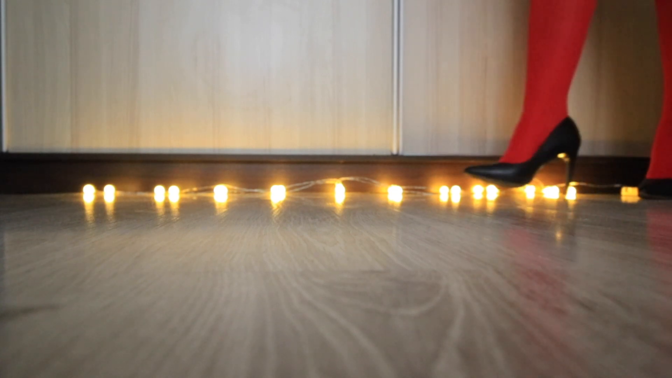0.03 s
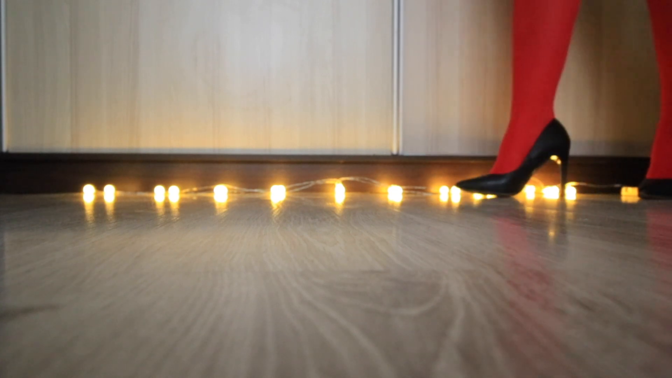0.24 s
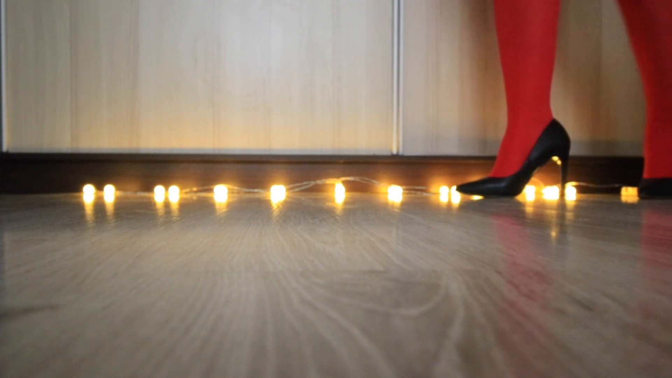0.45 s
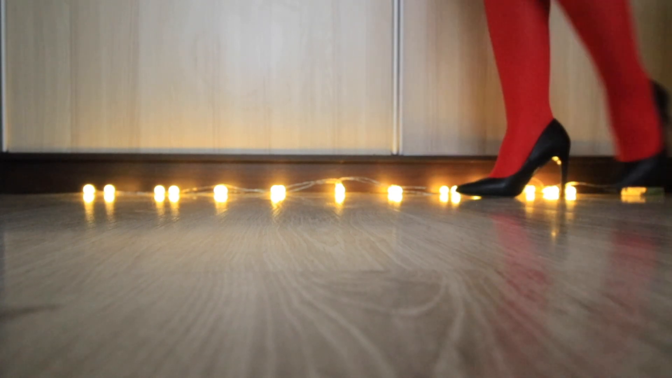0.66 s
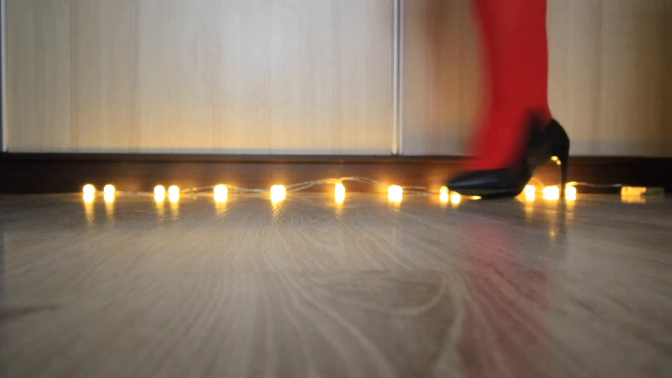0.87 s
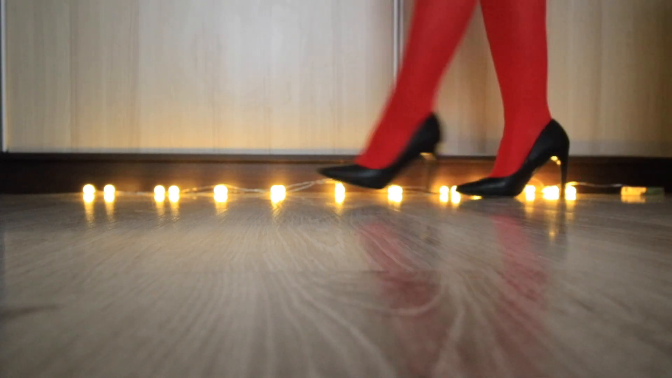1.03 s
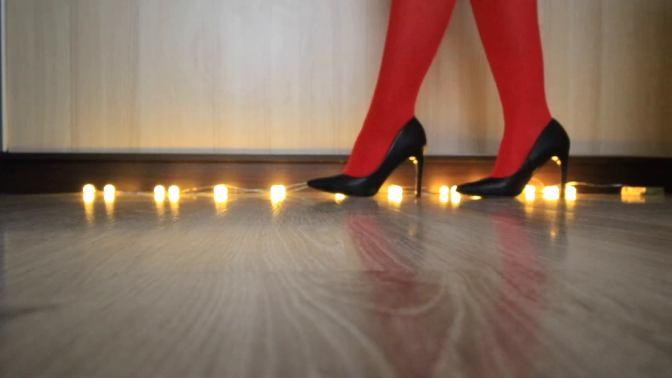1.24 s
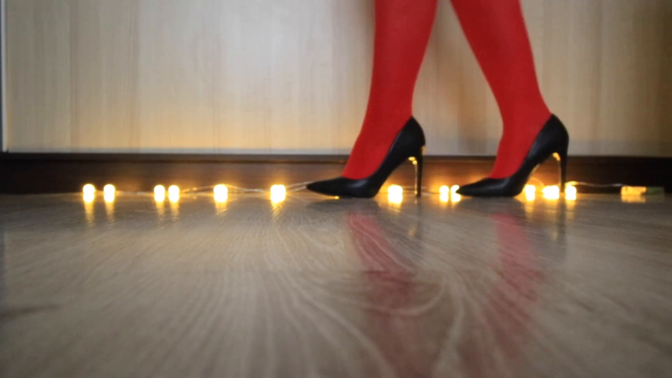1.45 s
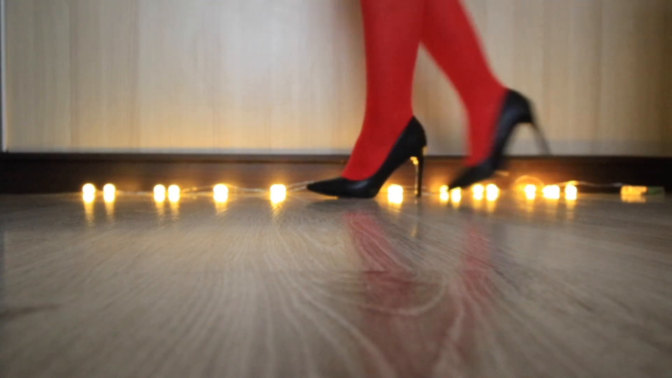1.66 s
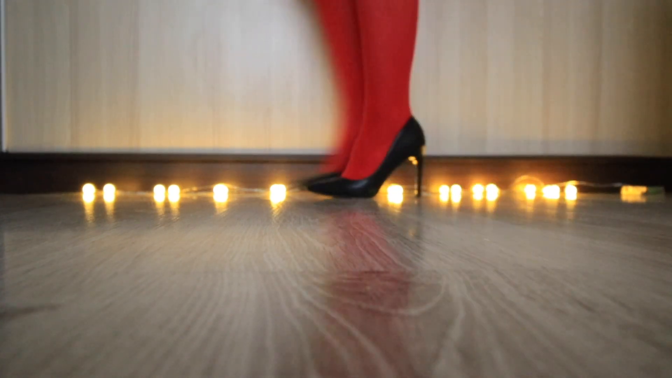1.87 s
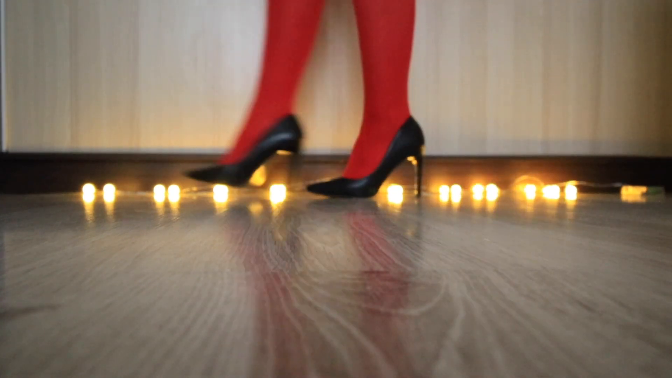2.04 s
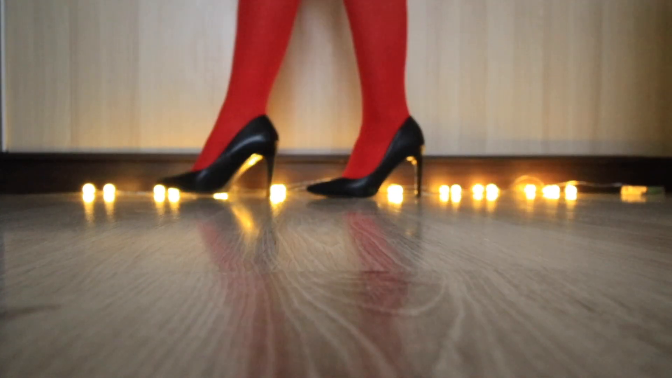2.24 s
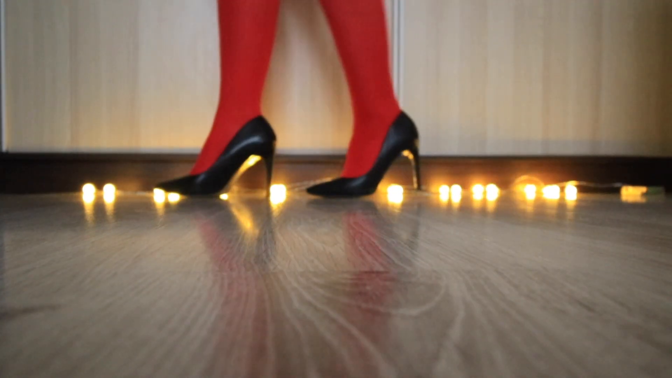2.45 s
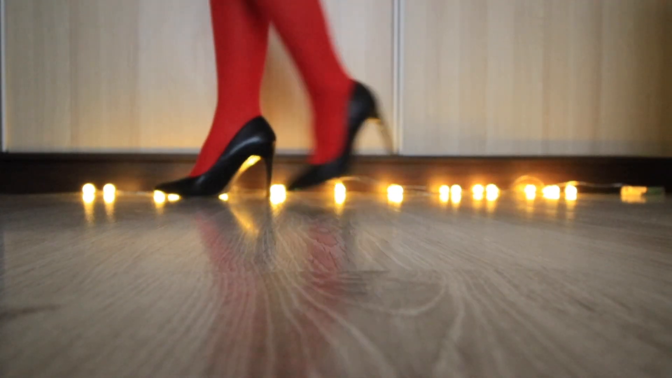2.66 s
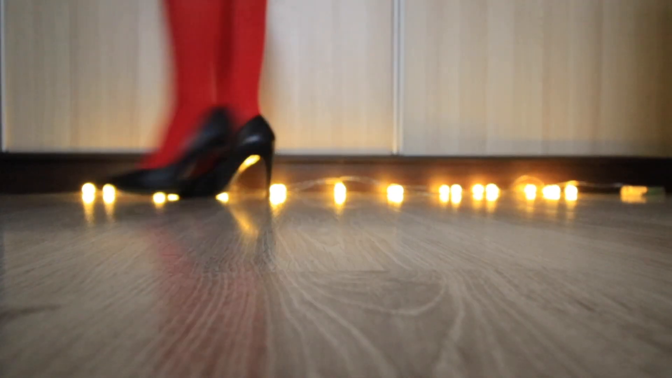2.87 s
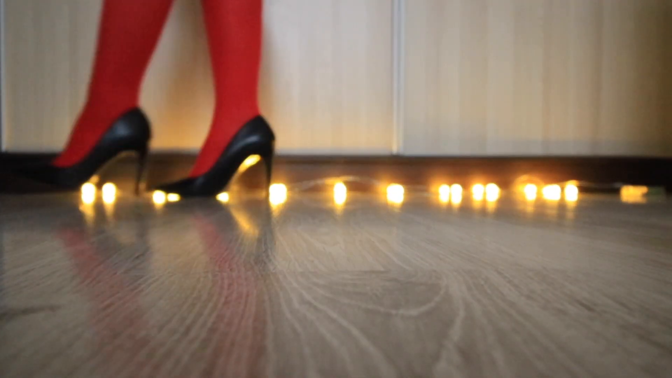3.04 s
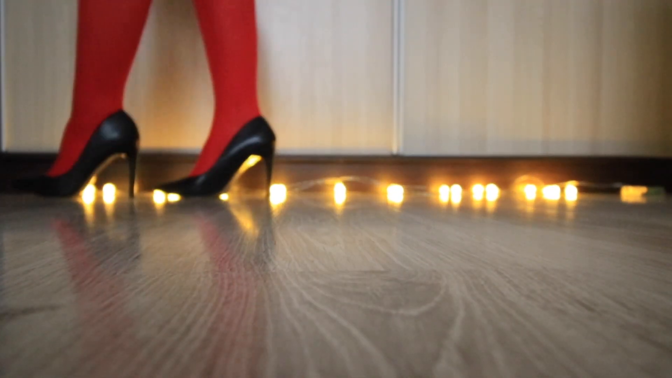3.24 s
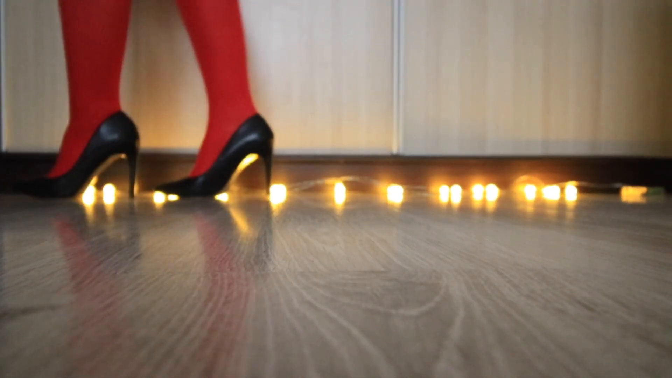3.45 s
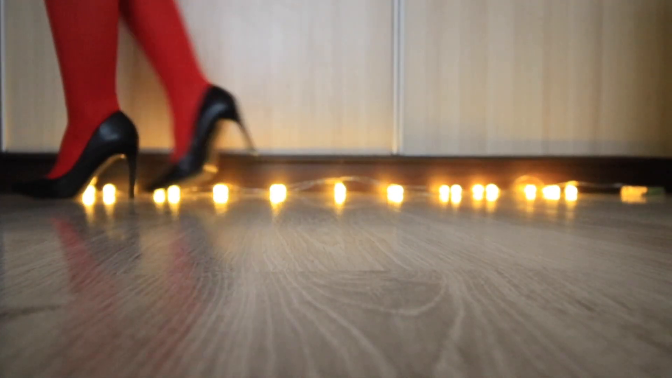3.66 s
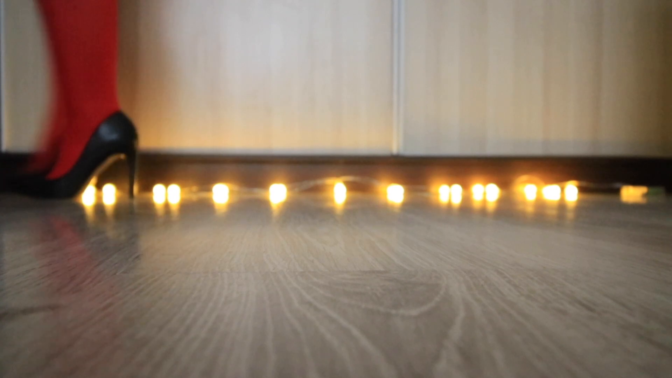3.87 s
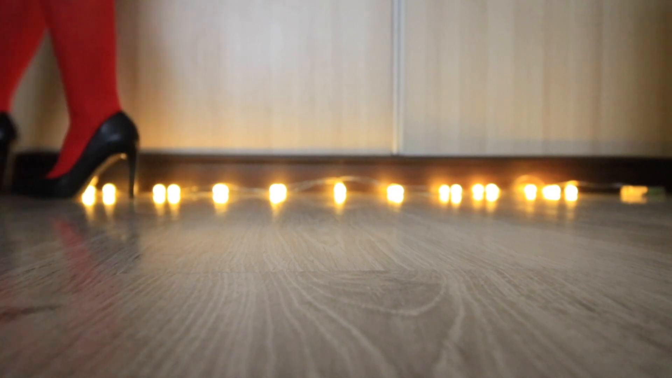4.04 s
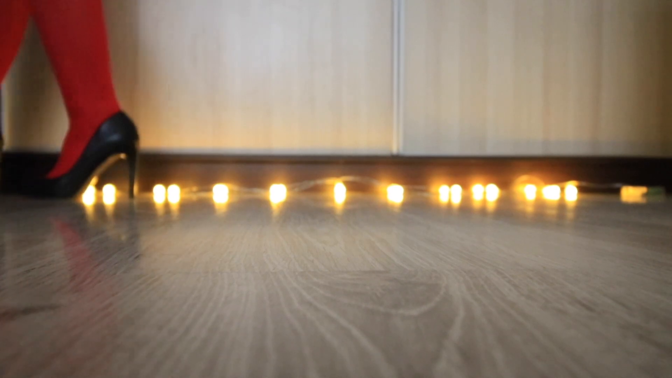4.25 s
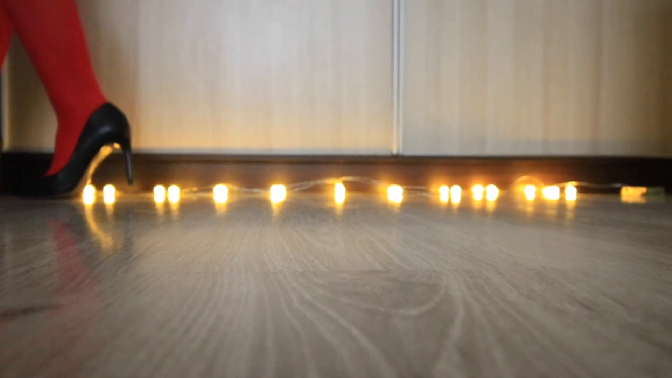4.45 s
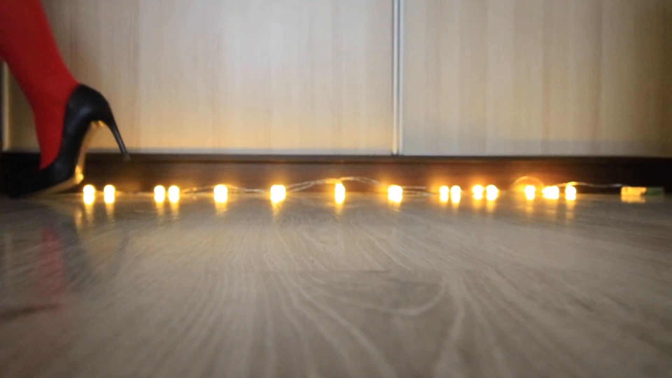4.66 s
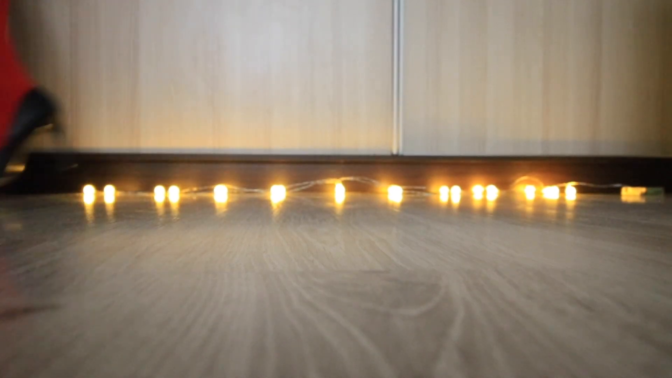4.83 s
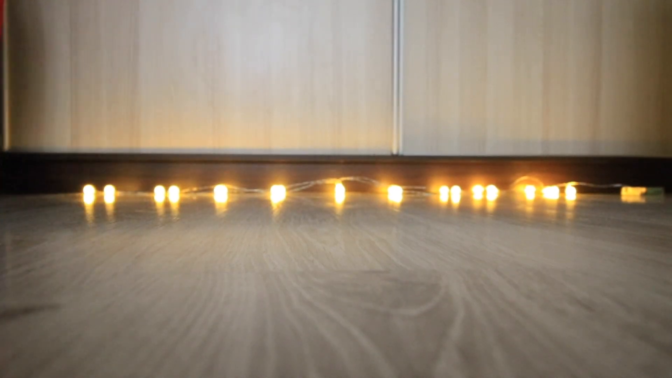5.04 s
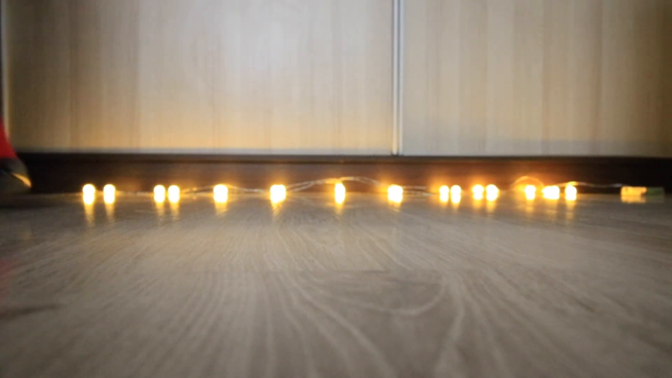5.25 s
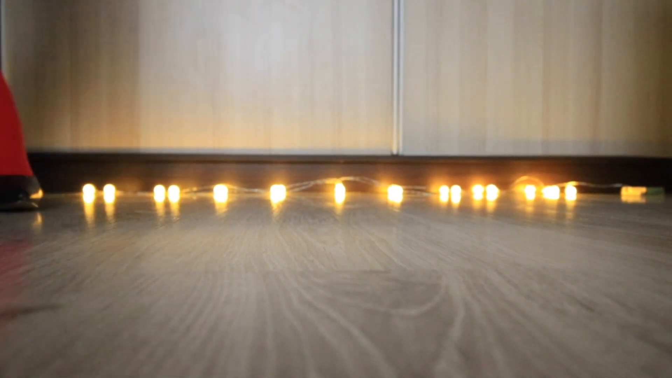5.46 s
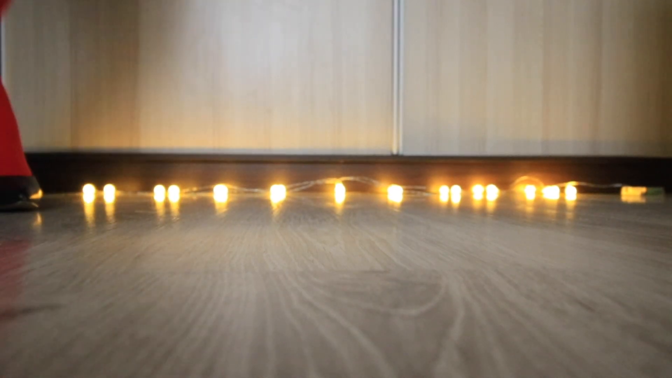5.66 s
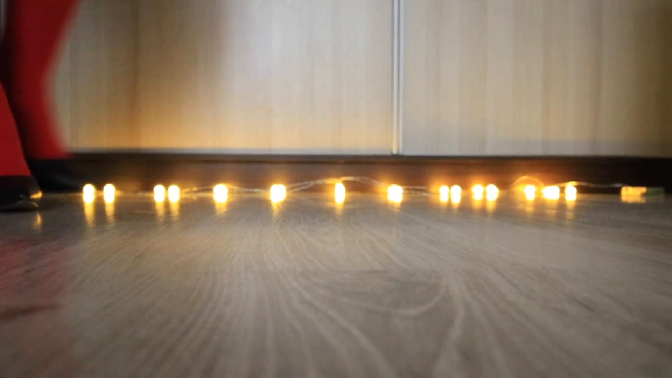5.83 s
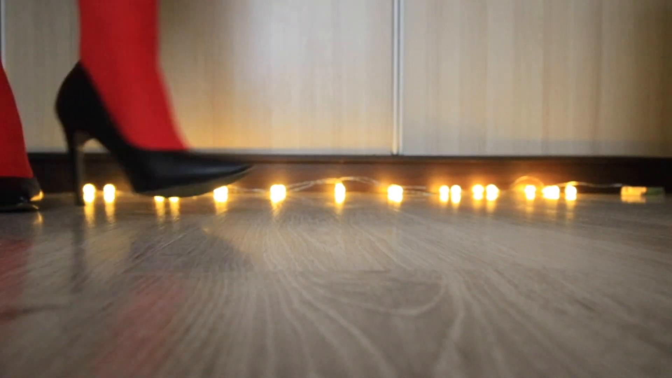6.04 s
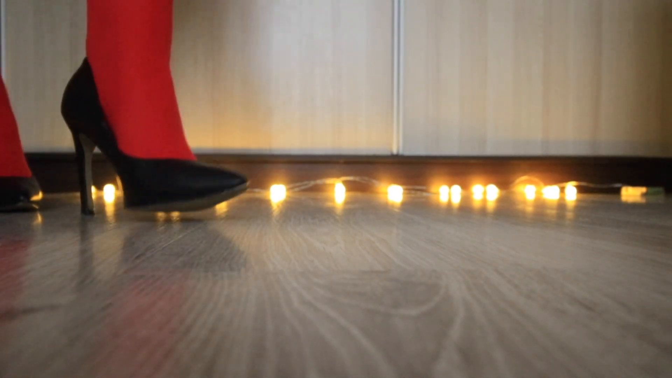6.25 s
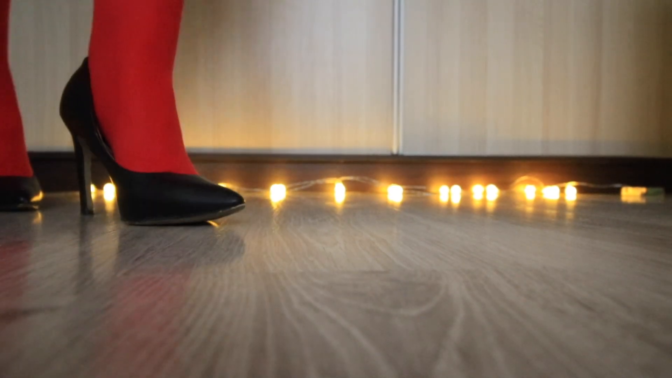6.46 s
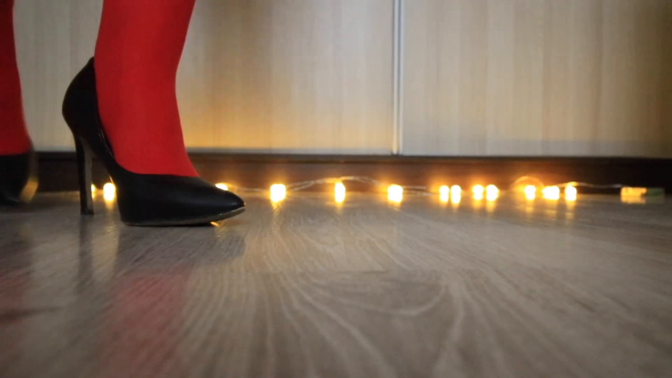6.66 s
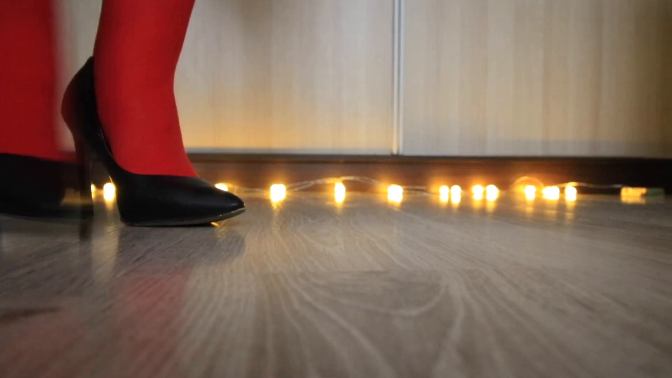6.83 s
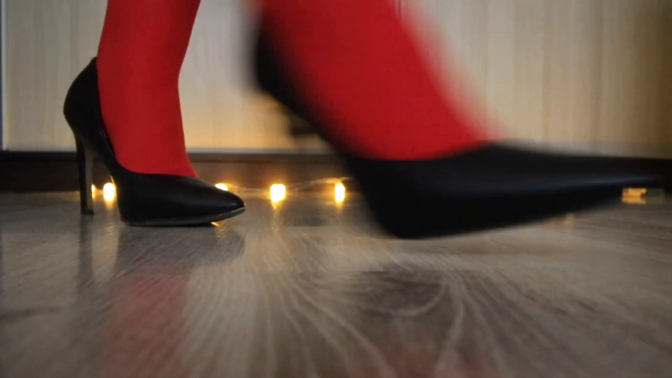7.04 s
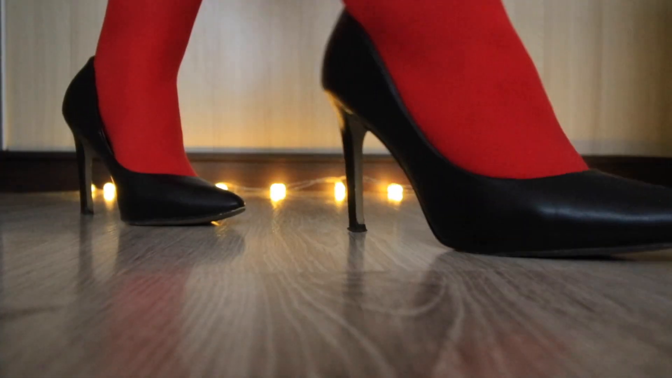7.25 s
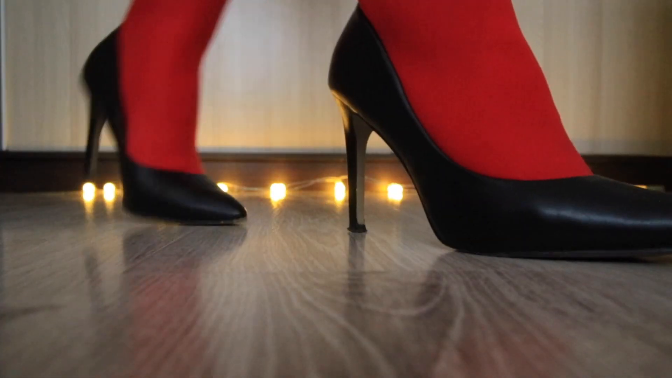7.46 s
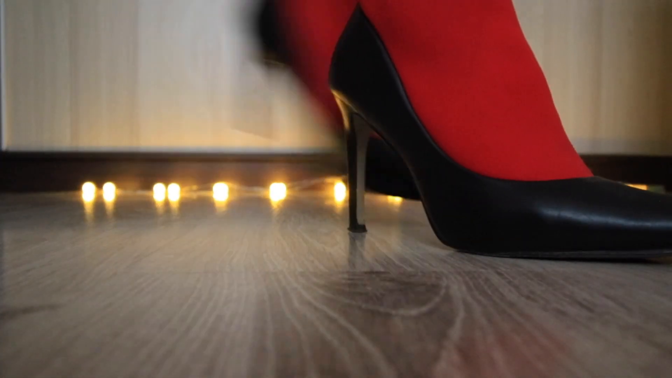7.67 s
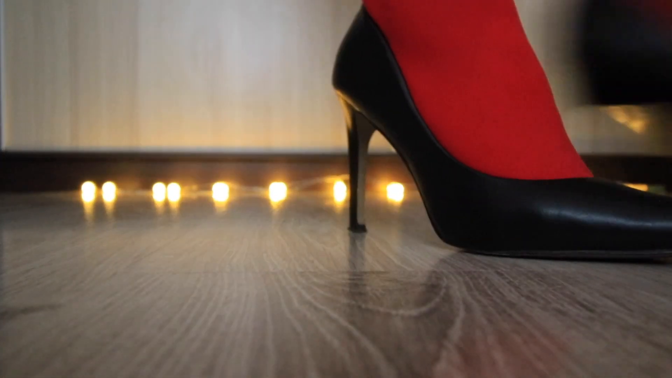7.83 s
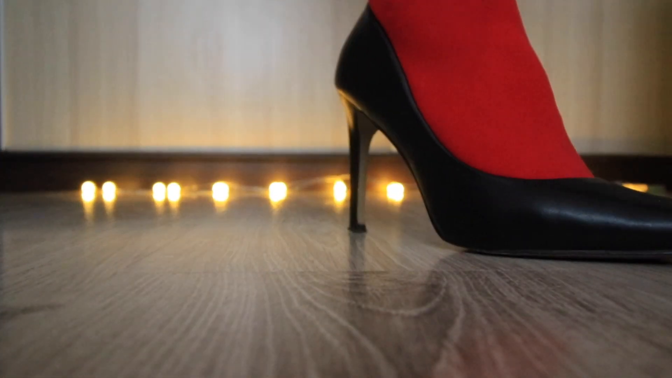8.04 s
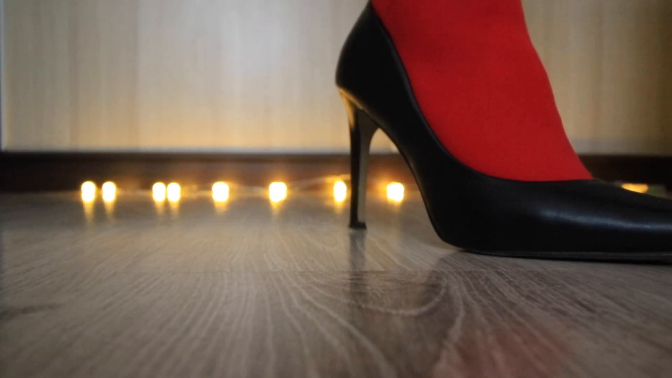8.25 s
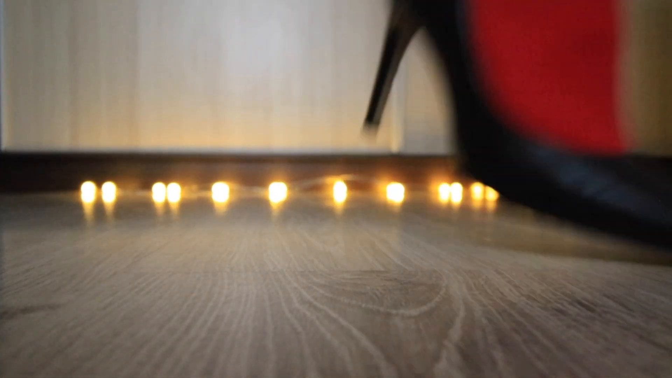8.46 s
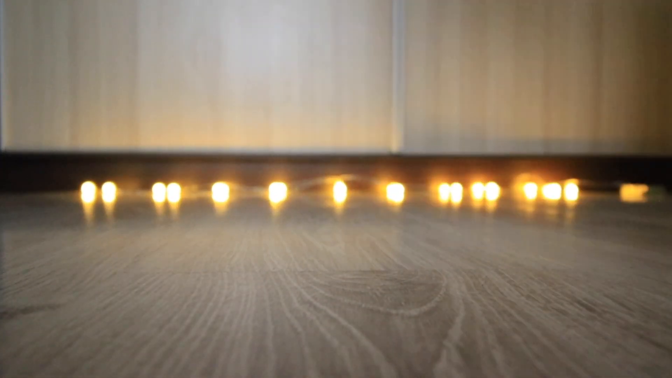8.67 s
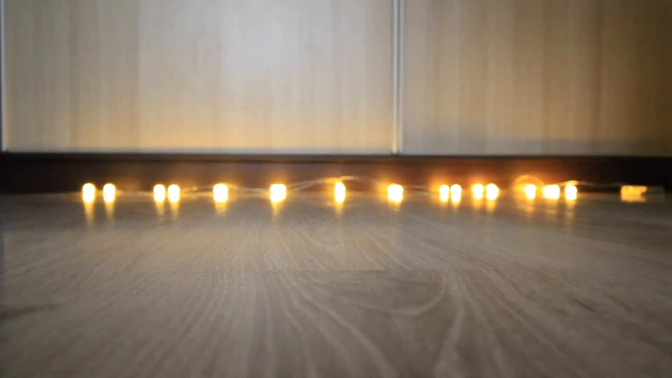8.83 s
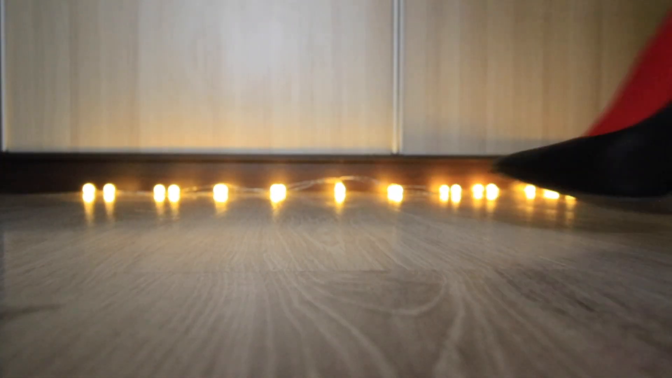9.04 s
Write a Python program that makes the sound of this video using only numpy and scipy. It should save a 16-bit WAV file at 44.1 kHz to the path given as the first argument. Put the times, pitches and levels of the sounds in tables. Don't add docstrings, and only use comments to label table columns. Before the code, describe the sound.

A quiet small furnished room with faint hum and hiss, heard from a microphone on the floorboards. Stiletto heels land slowly at about 0.1, 1.2, 2.2, 3.2, 4.2, 5.3, 6.3, 7.1 and 8.0 seconds. Each gives a hard tick and a short hollow wooden knock, with a softer settling knock or sole slap 0.1 to 0.3 seconds later. The tick at 1.2 is sharp; bright snaps stand out at 3.6 and 3.9. Steps from 4.2 onward are generally heavier, the strongest at 7.1 with a firm slap at 7.3. Leather creases crackle around 4.4, and brief scuffs scrape at 4.3 and 6.4. Stockings swish softly between steps, clearest near 2.6, 3.6, 5.7 and 6.6. Boards creak faintly, with a short groan at 8.3. After a last swish near 8.5, only rustle and room tone remain.

```python
import sys
import numpy as np
from scipy import signal
from scipy.fft import rfft, irfft
from scipy.io import wavfile
from scipy.ndimage import uniform_filter1d

SR = 44100
rng = np.random.default_rng(int(sys.argv[2]) if len(sys.argv) > 2 else 0)


def makeup_ratio(level_db):
    decades = np.asarray(level_db, float) / 20
    return 10 ** decades


def bounce(signal):
    frames = np.transpose(np.atleast_2d(signal))
    limited = np.clip(frames, -1, 1)
    pcm = np.round(limited * 32767).astype(np.int16)
    wavfile.write(sys.argv[1], SR, pcm)


N = 401310
ROUND_S = 0.049
BUILD_S = 0.0022


def unit(x):
    return x / np.sqrt(np.mean(x ** 2) + 1e-20)


def along(points, hz):
    f, v = np.transpose(points)
    return np.interp(np.log(hz + 1), np.log(f + 1), v)


def add(track, s, sound):
    track[round(s * SR):][:len(sound)] += sound


def rush(spectrum, patchy_db):
    z = signal.stft(rng.standard_normal(N + 512), nperseg=512)[2]
    field = uniform_filter1d(rng.standard_normal(z.shape), size=6, axis=0)
    field = uniform_filter1d(field, size=8, axis=1)
    x = signal.istft(z * makeup_ratio(patchy_db * unit(field)), nperseg=512)[1][:N]
    colour = makeup_ratio(along(spectrum, np.fft.rfftfreq(N, 1 / SR)))
    return unit(irfft(rfft(x) * colour, N))


def swells(rows, rest_db, round_s):
    t = np.arange(N) / SR
    power = 0
    for s, db, rise, fall in rows:
        distance = np.where(t < s, (s - t) / rise, (t - s) / fall)
        power = power + makeup_ratio(2 * db - 49 * distance)
    power = uniform_filter1d(power, size=int(round_s * SR) + 1)
    return np.sqrt(np.abs(power) + makeup_ratio(2 * rest_db))


# pitch in Hz, time to fade by 60 dB in seconds.
ROOM = [(60, 0.33), (200, 0.18), (500, 0.26), (1500, 0.22), (4000, 0.19), (9000, 0.31), (15000, 0.013)]


def answer(sound, wet_db, delay, crumble=0):
    hz, t, z = signal.stft(rng.standard_normal(SR // 2), SR, nperseg=256)
    fade = makeup_ratio(-60 * t / along(ROOM, hz)[:, None])
    tail = signal.istft(z * fade, SR, nperseg=256)[1]
    n = np.arange(len(tail))
    tail = tail * np.clip(n / (delay * SR), 0, 1)
    tail = tail * (1 + 1.5 * np.exp(-n / (0.0035 * SR)))
    path = makeup_ratio(wet_db) * tail / np.linalg.norm(tail)
    slips = 0.14 * rng.standard_normal(256) * np.exp(-np.arange(256) / (crumble * SR + 1e-3))
    slips[0] = 1
    path[:256] += slips / np.linalg.norm(slips)
    return signal.fftconvolve(sound, path)


def struck(modes, steep):
    f = np.fft.rfftfreq(8192, 1 / SR)
    power = 0
    for centre, width, db in modes:
        damping = (f * width) ** 2
        power = power + makeup_ratio(2 * db) * (damping / ((centre ** 2 - f * f) ** 2 + damping)) ** steep
    cep = irfft(np.log(power + 1e-10) / 2)
    cep[1:4096] *= 2
    cep[4097:] = 0
    pulse = irfft(np.exp(rfft(cep)))[:4096]
    return pulse / np.abs(pulse).max()


def pressed(pulse):
    contact_s = 0.00067
    pulse = pulse * (1 - 0.86 * np.exp(-np.arange(len(pulse)) / (contact_s * SR)))
    return pulse / np.abs(pulse).max()


def gathered(modes, steep):
    half = struck([(hz, width, db / 2) for hz, width, db in modes], steep / 2)
    ring = signal.fftconvolve(half, half[:round(BUILD_S * SR)][::-1])
    return ring / np.abs(ring).max()


def snaps(ticks):
    track = np.zeros(N + SR)
    for s, db, hz, treble_db, body_db, room_db in ticks:
        shell = [(1.016 * hz, 900, 2), (0.9 * hz, 1500, -6)]
        body, tick = (2100, 1800, body_db + 14), (7500, 5000, treble_db + 4.5)
        ring = gathered(shell + [body, tick], steep=1.9)
        heard = answer(ring, room_db, delay=0.00085, crumble=0.00085)
        add(track, s + 0.0007 - BUILD_S, makeup_ratio(db + 3) * heard)
    return signal.sosfilt(signal.butter(3, 11000, fs=SR, output="sos"), track[:N])


def through_boards(track):
    return signal.sosfilt(signal.butter(4, [142, 1450], "bandpass", fs=SR, output="sos"), track[:N])


# pitch in Hz, width in Hz, level in dB.
UPPER = [(854, 300, 6), (1160, 730, -8.5), (1390, 550, 0)]
# time in seconds, level in dB.
AWAY = [(0, 4.5), (2.2, 3.5), (4.2, -1.5), (5.3, 2.5), (6.3, 2.5), (7.2, -2.5), (8.3, -6)]


def knocks(blows):
    track = np.zeros(N + SR)
    for s, db, boom_hz, board_hz, boom_db, upper_db in blows:
        plank = np.exp(rng.normal(0, 0.04))
        boom = [(boom_hz, 50, boom_db + 12), (0.65 * boom_hz, 50, boom_db + 4)]
        between = (np.sqrt(boom_hz * board_hz), 90, 0.97 * boom_db + 7)
        board = [between, (board_hz, 100, 0), (1.19 * board_hz, 160, -5)]
        upper = [(hz * plank, width, upper_db + level - 4) for hz, width, level in UPPER]
        ring = pressed(struck(boom + board + upper, steep=0.9))
        wet_db = np.interp(s, *np.transpose(AWAY))
        add(track, s - 0.0008, makeup_ratio(db) * answer(ring, wet_db, delay=0.0011))
    return through_boards(track)


# pitch in Hz, level in dB per Hz.
HISS = [(710, -66), (1200, 6), (4960, -3.5), (8720, -21.5), (14800, -6.5), (16000, -10)]


def microphone_hiss():
    return makeup_ratio(-65.5) * rush(HISS, patchy_db=-0.2)


# pitch in Hz, level in dB per Hz.
TONE = [(53, -54), (90, -8), (151, -3), (333, -6), (396, -8.5), (565, -5.5), (695, -8.5), (1400, -17.5),
        (1820, -44), (3080, -120)]


def room_tone_and_creaks():
    creaks = [(row[0] + 0.15, row[1] - 46.5, 0.067, 0.27) for row in HEELS]
    creaks += [(s, db - 9.5, rise, fall) for s, db, _, rise, fall in SWINGS]
    return makeup_ratio(4.5) * swells(creaks, -66, ROUND_S) * rush(TONE, patchy_db=1.5)


# pitch in Hz, level in dB per Hz.
RUMBLE = [(12, -31), (25, -24), (40, -2), (58, 0.5), (80, -1.5), (110, -5), (150, -57), (240, -120)]
# time in seconds, rumble level in dB.
LOADS = [(.15, -62), (.35, -60), (1.28, -53), (1.45, -59), (2.24, -54), (2.62, -58), (3.28, -50),
         (4.17, -55), (4.75, -63), (5.28, -50), (5.38, -52), (5.71, -58), (6.27, -42), (6.36, -40),
         (6.47, -70), (6.68, -55), (7.15, -45), (7.38, -49.5), (7.58, -57), (8.06, -45), (8.19, -48.5),
         (8.29, -59), (8.52, -53.5)]


def weight_rumble():
    rise_s, fall_s = 0.059, 0.17
    loads = [(s, db, rise_s, fall_s) for s, db in LOADS]
    return swells(loads, -72.5, round_s=0.01) * rush(RUMBLE, patchy_db=-0.5)


# pitch in Hz, level in dB per Hz.
CLOTH = [(530, -40), (900, -0.5), (982, -1), (1160, -2), (2820, 1.5), (4840, -4), (6000, -8), (7800, -38),
         (13200, -120)]
# pitch in Hz, level in dB per Hz.
NYLON = [(2940, -22), (4800, -10), (6290, 2), (7490, 2.5), (9410, 2.5), (10500, 0), (12400, -2),
         (15100, -13.5), (16000, -7)]
# closest pass in seconds, swish level in dB, treble over it in dB,
# rise in seconds, fall in seconds.
SWINGS = [(0.6, -58, 2, 0.3, 1), (0.95, -60.5, 2.5, .4, 0.16), (1.61, -54.5, 5, .2, 0.58),
          (2.649, -50.5, 6.5, 0.22, 0.31), (2.85, -64.5, 2.5, 0.43, 0.86), (3.64, -50.5, 5, 0.25, 0.38),
          (4.73, -57.5, 2.5, 0.75, 0.56), (5.7, -48, 3.5, .25, 0.36), (5.87, -65, 11.5, .4, .25),
          (6.64, -50, 11, 0.22, 0.28), (6.96, -58.5, 0.5, 0.38, 0.43), (7.56, -52, 2.5, 0.26, 0.33),
          (7.73, -56.5, 1.5, 0.6, 0.18), (8.501, -53.5, 7.5, 0.32, 0.36), (8.75, -61.5, 1, 0.9, 0.8)]


def stockings():
    body = [(s, db, rise, fall) for s, db, _, rise, fall in SWINGS]
    mesh = [(s, db + treble_db - 0.5, 0.73 * rise, 0.69 * fall)
            for s, db, treble_db, rise, fall in SWINGS]
    for row in HEELS:
        body.append((row[0] + 0.026, -60, 0.055, 0.75))
        mesh.append((row[0] + 0.026, -61.5, 0.055, 0.75))
    swish = swells(body, -67.5, ROUND_S) * rush(CLOTH, patchy_db=2)
    return swish + swells(mesh, -65, ROUND_S) * rush(NYLON, patchy_db=1.7)


# time in seconds, peak level in dB, ring pitch in Hz, body level in dB,
# room level in dB.
TIPS = [(0.122, -33, 3050, -2, -2), (1.236, -10.5, 3770, -10, -1), (2.2092, -21, 3500, -9, -3),
        (3.1702, -26, 3060, -11, -2.5), (3.258, -26.5, 3300, 8, -2), (3.5964, -7.5, 3900, -31, -4),
        (3.6232, -14, 4000, -27, -7.5), (4.1535, -17.5, 3300, -24, -7), (4.2957, -23, 4080, -16, -5),
        (5.274, -18.5, 3360, -18, -7), (5.3707, -21.5, 3180, -8, -5), (6.2546, -19, 3350, -23, -6.5),
        (6.351, -27, 3570, -17, -9), (7.128, -19.5, 3700, -10, -8), (7.9933, -48.5, 3930, -25, 10.5),
        (8.041, -31.5, 3540, -10, 2)]


def heel_tips():
    treble_db = -30
    return [(s, db, hz, treble_db, body_db, room_db) for s, db, hz, body_db, room_db in TIPS]


# time in seconds, peak level in dB, boom level in dB.
HEELS = [
    (0.124, -16, -11.5),
    (1.238, -18, -6),
    (2.211, -13.5, -11.5),
    (3.172, -18, -12),
    (4.155, -8, -15.5),
    (5.274, -12, -12.5),
    (6.254, -8.5, -6.5),
    (7.1286, -5.5, -8.5),
    (8.044, -6.5, -18),
]
# boom pitch in Hz, board pitch in Hz, upper tones in dB.
PLANKS = [(184.3, 493, -18), (178, 477, -69), (181, 462, -10), (168, 454, -14), (251, 516, -9),
          (224, 497, -7), (206, 558, -9), (283, 440, -9), (290, 424, -25)]


def heels():
    blows = []
    for (s, db, boom_db), (boom_hz, board_hz, upper_db) in zip(HEELS, PLANKS):
        blows.append((s, db, boom_hz, board_hz, boom_db, upper_db))
    return blows


# time in seconds, peak level in dB, boom pitch in Hz,
# board pitch in Hz, upper tones in dB.
SETTLES = [(0.269, -35, 173, 470, -17), (0.328, -37.5, 128, 600, -8), (0.873, -44, 135, 565, -2),
           (1.41, -27.5, 200, 484, 0), (1.441, -33.5, 206, 490, -15), (2.293, -30, 163, 370, -5.5),
           (2.466, -48, 120, 468, 0), (3.2586, -26, 140, 396, -3.5), (3.308, -27, 196, 580, -7.5),
           (4.259, -28.5, 160, 394, -19), (5.37, -26.5, 120, 435, -9), (5.681, -40, 243, 425, -5),
           (6.34, -23, 202, 450, 1), (6.363, -38, 142, 423, -10), (7.189, -25.5, 164, 670, -20),
           (7.569, -38, 135, 584, -11), (8.165, -22.5, 263, 505, 4.5), (8.258, -21, 286, 424, -3)]


def settling_feet():
    boom_db = -8.5
    return [(s, db, boom_hz, board_hz, boom_db, upper_db) for s, db, boom_hz, board_hz, upper_db in SETTLES]


# time in seconds, peak level in dB, ring pitch in Hz, treble level in dB.
CREASES = [(0.2712, -22.5, 3850, -2), (0.3807, -16.5, 3970, 2), (1.41, -30, 3730, -14),
           (1.423, -24.5, 3820, -1), (3.031, -40, 3090, -4), (3.4286, -36.5, 3320, -15),
           (3.9732, -18.5, 3780, -12.5), (4.3849, -20, 4200, -10), (4.4185, -20, 4040, -12),
           (4.4624, -21.5, 3740, -8), (4.5, -27.5, 3770, -11), (5.4642, -24, 4230, -13),
           (6.3406, -19, 3780, -16.5), (7.195, -29, 3300, 6), (7.2918, -31.5, 3520, -4),
           (8.3418, -44, 4100, -16)]


def leather_creases():
    body_db, room_db = -13.5, 2.5
    return [row + (body_db, room_db) for row in map(tuple, CREASES)]


# start in seconds, level in dB, pitch in Hz, length in seconds.
GROANS = [
    (.98, -59, 155, .24),
    (8.275, -49, 280, .12),
]


def groans():
    track = np.zeros(N + SR)
    for s, db, hz, length in GROANS:
        t = np.arange(round(length * SR)) / SR
        note = np.sin(2 * np.pi * hz * t) * np.sin(np.pi * t / length) ** 2
        add(track, s, makeup_ratio(db) * answer(note, -3, delay=0.005))
    return through_boards(track)


# start in seconds, level in dB, length in seconds,
# middle pitch in Hz.
SCUFFS = [
    (1.422, -39.5, 0.024, 7060),
    (4.272, -32, 0.023, 4030),
    (6.3678, -21, 0.0057, 4200),
    (6.376, -45, 0.022, 7760),
]


def scuffs():
    track = np.zeros(N + SR)
    t = np.arange(SR // 8) / SR
    for s, db, length, hz in SCUFFS:
        grit = rng.standard_normal(len(t)) * rng.exponential(1, len(t))
        grit = grit * np.exp(-(t / length) ** 2)
        band = signal.butter(2, [0.52 * hz, 1.43 * hz], "bandpass", fs=SR)
        add(track, s, makeup_ratio(db) * answer(signal.lfilter(*band, grit), -5.5, delay=0.01))
    return track[:N]


# time in seconds, peak level in dB, ring pitch in Hz, treble level in dB.
PATS = [
    (2.2905, -38.5, 3070, -13),
    (3.2844, -42, 3220, -13),
    (5.374, -35, 3360, -22),
    (5.436, -29.5, 3020, 2),
    (8.158, -31.5, 4200, -10),
]


def sole_pats():
    body_db, room_db = 9, 7
    return [row + (body_db, room_db) for row in map(tuple, PATS)]


# time in seconds, peak level in dB, ring pitch in Hz,
# treble level in dB, body level in dB.
CRACKS = [(2.353, -36, 4100, -4, -7), (3.3073, -22.5, 3270, -12.5, -21), (3.9338, -4, 4140, -12.5, -39),
          (4.2602, -12, 3860, -11, -21), (5.002, -32, 3410, -10, -2), (5.46, -20, 3640, -14, -8),
          (6.2708, -17.5, 3930, -21, -14.5), (7.1894, -20.5, 4260, -14, -6), (7.3268, -11, 3130, -10, -3),
          (8.137, -33.5, 3780, -21, 13), (8.203, -25.5, 4230, -14, -12.5)]


def shoe_cracks():
    room_db = -5.5
    return [row + (room_db,) for row in map(tuple, CRACKS)]


# time in seconds, peak level in dB, board pitch in Hz, upper tones in dB.
SLAPS = [
    (3.43, -25.5, 470, 2.5),
    (3.975, -42, 664, -4),
    (4.288, -23, 508, -24),
    (5.439, -18, 505, -5),
    (6.423, -24, 520, -8),
    (7.329, -14.5, 526, 1),
    (7.99, -38, 534, -11),
]


def sole_slaps():
    boom_hz, boom_db = 300, -27.5
    return [(s, db, boom_hz, board_hz, boom_db, upper_db) for s, db, board_hz, upper_db in SLAPS]


def scene():
    boards = knocks(heels() + sole_slaps() + settling_feet()) + groans()
    shoes = snaps(heel_tips() + shoe_cracks() + leather_creases() + sole_pats()) + scuffs()
    background = stockings() + room_tone_and_creaks() + microphone_hiss() + weight_rumble()
    return (boards + shoes + background)[None]


def low_pass(x):
    return signal.sosfilt(signal.butter(12, 15800, fs=SR, output="sos"), x)


def record(dry):
    above_hz = np.clip(np.fft.rfftfreq(N, 1 / SR) - 15850, 0, None)
    slope = makeup_ratio(-above_hz / 15)
    mix = irfft(rfft(dry) * slope, N)
    return low_pass(mix)


dry = scene()
out = record(dry)
bounce(out)
```